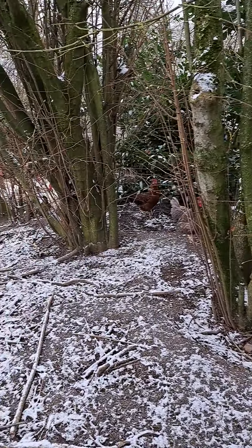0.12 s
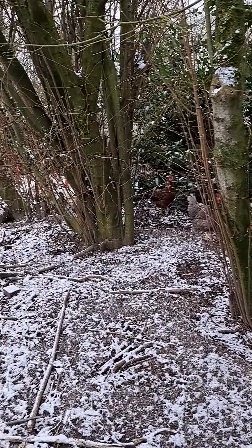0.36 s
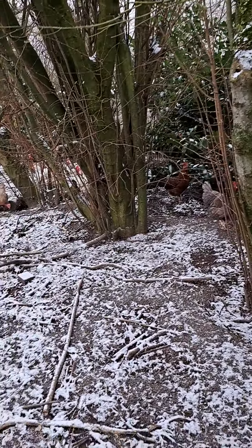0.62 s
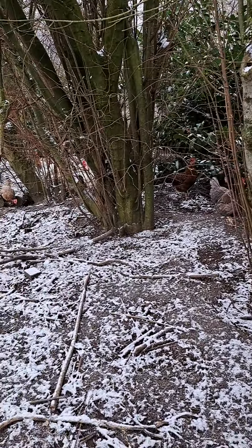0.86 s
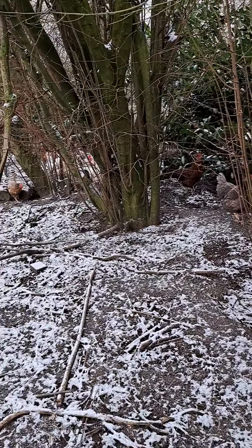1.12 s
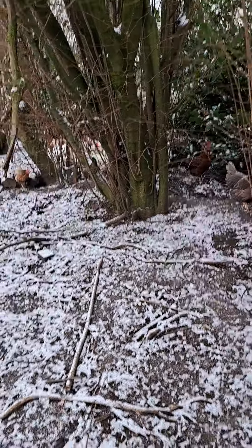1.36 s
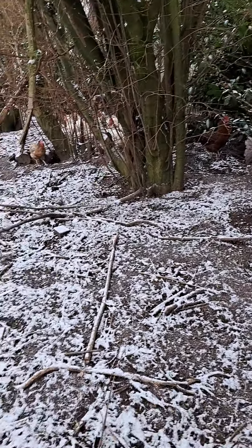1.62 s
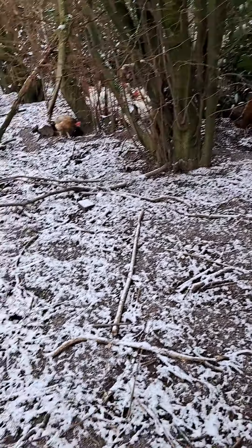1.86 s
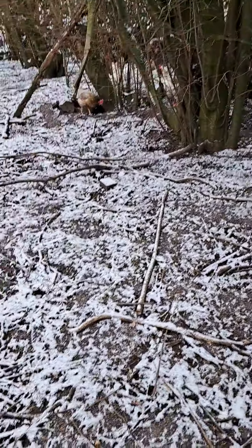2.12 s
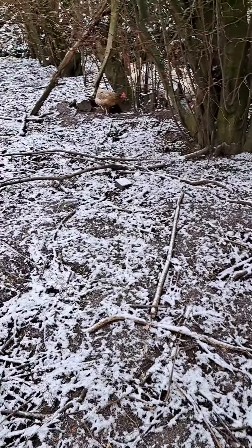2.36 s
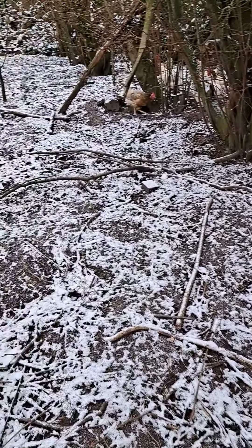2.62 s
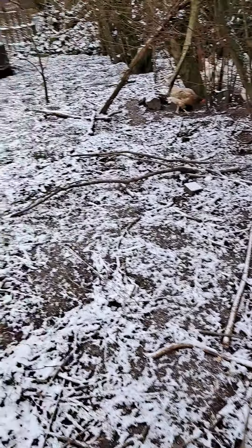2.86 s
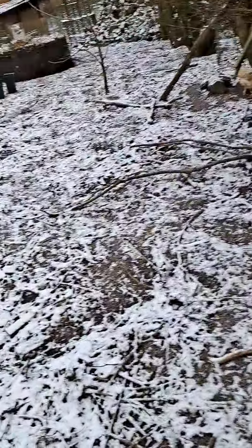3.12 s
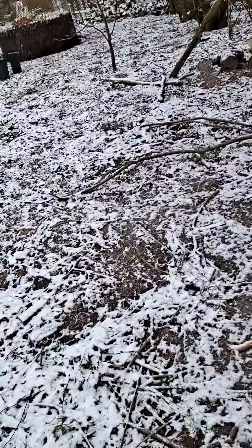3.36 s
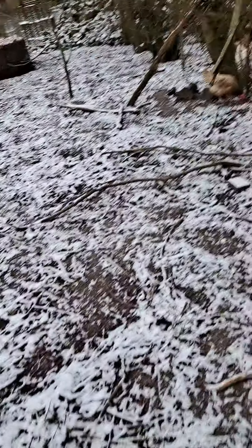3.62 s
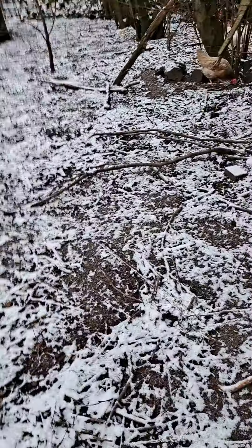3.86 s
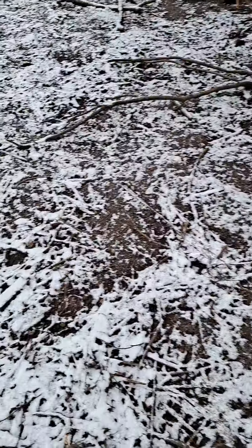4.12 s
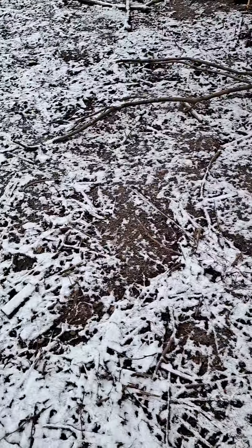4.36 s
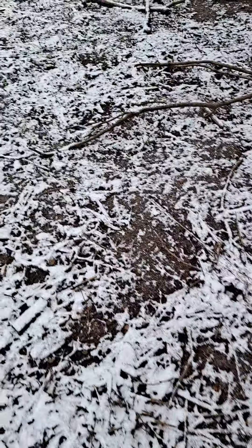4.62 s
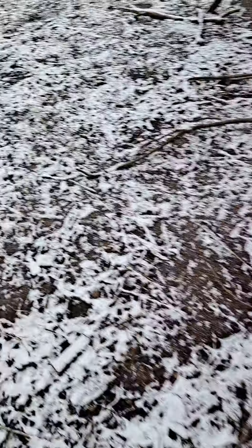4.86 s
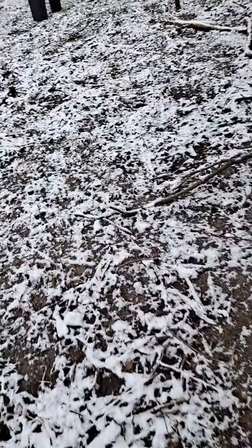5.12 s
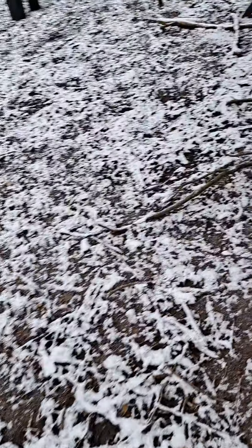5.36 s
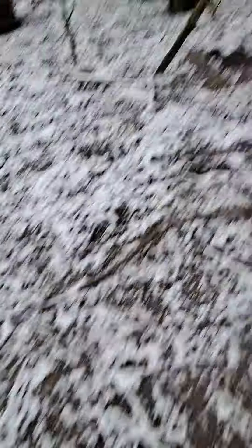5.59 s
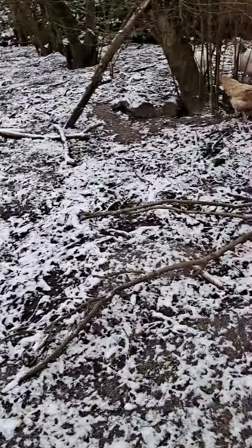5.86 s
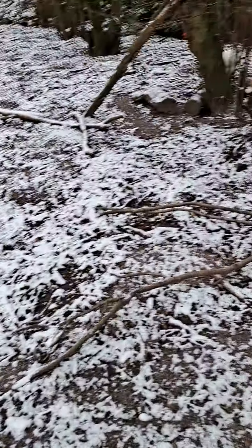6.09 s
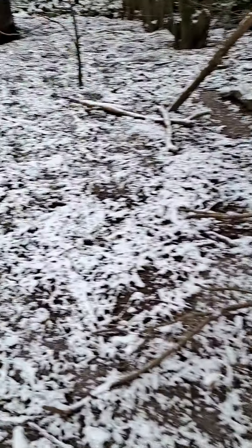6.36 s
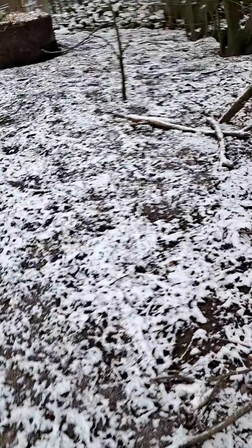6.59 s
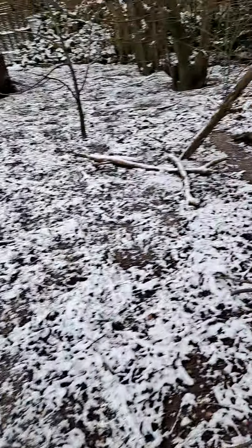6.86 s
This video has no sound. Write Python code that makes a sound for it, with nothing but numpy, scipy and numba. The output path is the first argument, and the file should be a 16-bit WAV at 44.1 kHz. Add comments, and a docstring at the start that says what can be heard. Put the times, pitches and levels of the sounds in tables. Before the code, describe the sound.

Soft gliding hen clucks open over faint outdoor air, followed by short grainy rubs of a sleeve and a small open cluck. Then uneven footsteps crush thin icy snow, dragging through frozen leaves and snapping twigs, with soft thuds beneath and airy whistles of coat fabric. A thin steady tone appears briefly late on. Near, dry stereo, with ground and hens stronger on the right and a duller, shadowed left.

```python
"""Outdoors on thin frozen snow over leaves and twigs, someone shifts and walks, phone in hand, one port to the ground.
Crust crushes in pitched grains and knocks in dull damped rings; twigs crack as noise bursts; ice crumbs tick.
Leaves rustle in clicks and hiss, soles thud in low noise, a sleeve rubs and coat fabric whistles in noise bands.
Hens cluck softly nearby in gliding tones, beside a thin, nearly steady tone, over a quiet outdoor hush."""
import sys
import numpy as np
from scipy import signal
from scipy.fft import rfft, irfft
from scipy.io import wavfile
from scipy.ndimage import uniform_filter1d
from numba import njit

SR = 44100
rng = np.random.default_rng(int(sys.argv[2]) if len(sys.argv) > 2 else 0)


def voltage_ratio(level):
    """Linear amplitude factor for a level in decibels (scalar or array-like)."""
    return 10 ** (np.asarray(level, float) / 20)


def unload_audio(sound):
    """Save the sound as a 16-bit wav file, at the path given as the first command line argument."""
    columns = np.transpose(np.atleast_2d(sound))
    # keep every value between -1 and 1, then stretch to whole-number steps
    steps = np.round(np.clip(columns, -1, 1) * 32767)
    wavfile.write(sys.argv[1], SR, steps.astype(np.int16))


N = 307675
T = np.arange(N) / SR  # seconds


def level(x, db):
    """Set the rms level in dB."""
    return x * voltage_ratio(db) / np.sqrt(np.mean(x ** 2))


def both(a_db, b_db):
    """Power sum of two levels in dB."""
    return 10 * np.log10(voltage_ratio(a_db) ** 2 + voltage_ratio(b_db) ** 2)


def colour(x, points):
    """Causal minimum-phase filter through (Hz, dB) points."""
    hz, db = np.transpose(points)
    size = 4096
    grid = np.maximum(np.arange(size // 2 + 1) * SR / size, 1)
    cepstrum = irfft(np.log(voltage_ratio(np.interp(np.log(grid), np.log(hz), db))))
    # fold the cepstrum forward in time so that the filter is causal
    cepstrum[1:size // 2] *= 2
    cepstrum[size // 2 + 1:] = 0
    impulse = irfft(np.exp(rfft(cepstrum)))
    return signal.fftconvolve(x, impulse)[:len(x)]


def no_bass(x):
    """Small pieces radiate little bass: thin the lows and lift the top."""
    return colour(x, [(40, -23.0), (220, -6.0), (400, -1.5), (17000, 13.5)])


def walk(rate):
    """Random levels held 1 / rate s and smoothed twice; spread near 1."""
    k = int(SR / rate)
    steps = np.repeat(rng.standard_normal(N // k + 1), k)
    return 1.3 * uniform_filter1d(uniform_filter1d(steps, k), k)[:N]


def strokes(s, db, swell, hold, fade):
    """Level in dB of overlapping gestures: each swells, holds and fades (slopes in dB/s)."""
    t = T[::32, None]
    each = db - swell * np.maximum(s - t, 0) - fade * np.maximum(t - s - np.abs(hold), 0)
    total = 10 * np.log10(np.sum(voltage_ratio(each) ** 2, axis=1) + 1e-12)
    return np.interp(T, t[:, 0], total)


@njit
def rings(length, start, turn, fade, size):
    """Damped sines, one for each grain, stopped once 300 times smaller."""
    out = np.zeros(length)
    for g in range(len(start)):
        z, p, i = size[g] + 0j, fade[g] * np.exp(1j * turn[g]), start[g]
        while abs(z) > size[g] / 300 and i < length:
            out[i] += z.imag
            z, i = z * p, i + 1
    return out


def ring(s, hz, cycles, size):
    """Ringing grains that lose 50 dB in about three times the given cycles."""
    start = (s * SR).astype(np.int64)
    return rings(N, start, 2 * np.pi * hz / SR, np.exp(-hz / SR * 2 / cycles), size)


def clicks(rate, spread_db):
    """Single-sample breaks at a mean rate per second, many small and a few large."""
    chance = rng.random((3, N))
    sign = np.sign(chance[1] - .5)
    return level((chance[0] < rate / SR) * sign * voltage_ratio(-spread_db * np.log(chance[2] + 1e-3)), 0)


# Hush and hiss at the lower and the upper port. Each row: frequency in Hz, relative level in dB per Hz.
LOWER_AIR = [(20, -24), (69, -14.5), (326, -2), (805, -11.5), (3590, -24.5), (7470, -1), (9360, -22),
             (13900, -1.5), (15600, -19.5), (16900, -47)]
UPPER_AIR = [(60, 2.5), (400, -2), (1500, -14.5), (4500, -36), (8000, -18.5), (16500, -18)]


def air(spectrum, db):
    """Quiet outdoor hush and microphone hiss: steady coloured noise."""
    return level(colour(rng.standard_normal(N), spectrum), db)


def tones(notes, overtones, rough_db, wobble):
    """Tones of unsteady pitch and level; the overtones die away as the effort drops."""
    out = np.zeros(N)
    for note in notes:
        s, hz, db = np.transpose(note)
        phase = 2 * np.pi * np.cumsum(np.interp(T, s, hz) * (1 + wobble * walk(140))) / SR
        effort = voltage_ratio(2 * (np.interp(T, s, db) - max(db)))
        harmonics = sum(voltage_ratio(d) * np.sin(k * phase) for k, d in overtones)
        tone = np.sin(phase) + effort * harmonics
        gate = np.clip(np.minimum(T - s[0], s[-1] - T) / 0.02, 0, 1)
        out += np.sqrt(2) * tone * gate * voltage_ratio(np.interp(T, s, db) + rough_db * walk(65))
    return out


# Soft clucks, an open-beaked cluck, a drawn-out hoarse hen note and a thin, nearly steady tone; one list per note.
# Each row: time in seconds, pitch in Hz, relative level in dB.
CLUCKS = [
    [(.02, 285, -72), (.058, 325, -57), (.1, 325, -74)],
    [(.055, 380, -72), (.08, 450, -65), (.105, 480, -76)],
    [(.185, 300, -76), (.21, 470, -68), (.3, 455, -80)],
    [(.39, 435, -73), (.55, 385, -78)],
    [(.555, 300, -74), (.585, 430, -71), (.63, 440, -79)],
]
BOK = [
    [(1.718, 350, -68), (1.742, 292, -62), (1.782, 290, -71)],
]
WHINES = [
    [(4.12, 725, -77), (4.45, 735, -76), (4.61, 700, -78)],
]
TONE = [
    [(5.15, 705, -67), (5.48, 720, -67)],
]
# Throat overtones. Each row: multiple of the pitch, level in dB against the fundamental at full effort.
CLUCK_OVERTONES = [(2, -19), (3, -19)]
BOK_OVERTONES = [(2, -9), (3, -18), (4, -1), (5, -4), (6, -6)]


def hens_and_tone(scatter):
    """Gliding hen calls and a thin, nearly steady tone, with a short smear."""
    calls = tones(CLUCKS, CLUCK_OVERTONES, 4, .055) + tones(BOK, BOK_OVERTONES, 3, .05)
    calls = calls + tones(WHINES, [], 4, .05) + tones(TONE, [], 2, .007)
    return calls + voltage_ratio(-9) * signal.fftconvolve(calls, scatter)[:N]


# Sleeve rubbing beside the lower port. Each row: peak in seconds, relative level in dB, hold in seconds,
# fade in dB/s, treble level in dB against the main hiss, centre in Hz.
RUBS = [(0.156, -77.5, 0.033, 173, 5.5, 2580), (0.668, -61, 0.027, 140, -8, 2030),
        (0.975, -58.5, 0.032, 346, 0, 2500), (1.141, -69, 0.052, 670, -9.5, 1630),
        (1.3, -58.5, 0.033, 448, -2.5, 2160)]
# Main hiss of the cloth. Each row: multiple of the centre, relative level in dB per Hz.
CLOTH = [(.3, -24), (.6, -6), (1, 5), (1.5, -4), (2.25, -27), (6, -32)]
# Treble of the cloth. Each row: frequency in Hz, relative level in dB per Hz.
CLOTH_TREBLE = [(1500, -29.5), (3500, 12.5), (6500, 4.5), (12000, -24)]


def sleeve():
    """Cloth on cloth: a grainy hiss around each rub's centre, with its own share of treble."""
    out = 0
    for s, db, hold, fade, treble_db, hz in RUBS:
        rub = rng.standard_normal(N) * voltage_ratio(1.4 * walk(190))
        body = level(colour(rub, np.multiply(CLOTH, [hz, 1])), 0)
        treble = level(colour(rub, CLOTH_TREBLE), treble_db)
        out = out + (body + treble) * voltage_ratio(strokes(s, db, 890, hold, fade))
    return out


# Coat fabric whistling in some swings. Each row: peak in seconds, relative level in dB, hold in seconds, pitch in Hz.
WHISTLES = [(2.674, -55, 0.113, 7700), (3.72, -47, 0.02, 5050), (5.074, -47.5, 0.097, 5106),
            (5.999, -52, 0.054, 4940)]


def fabric():
    """Whistling fabric: a narrow band of noise whose centre drifts."""
    s, db, hold, hz = np.transpose(WHISTLES)
    slope = 450  # dB/s, swell and fade alike
    turns = np.cumsum(np.interp(T, s, hz) * (1 + .04 * walk(16))) / SR
    low_noise = uniform_filter1d(uniform_filter1d(rng.standard_normal(N), 18), 18)
    band = low_noise * np.sin(2 * np.pi * turns)
    return level(band, 0) * voltage_ratio(strokes(s, db, slope, hold, slope) + 4.3 * walk(40))


# Soles pressing into soft soil. Each row: peak in seconds, relative level in dB, hold in seconds.
THUDS = [(2.451, -72.5, 0.52), (3.56, -63.5, 0.024), (3.658, -61, 0.026), (3.71, -55, 0.042),
         (3.913, -60.5, 0.14), (4.157, -60, 0.018), (4.39, -64.5, 0.085), (4.8, -60, 0.0108),
         (4.92, -53, 0.053), (5.114, -51, 0.0065), (5.203, -54.5, 0.0079), (5.597, -64, 0.041),
         (5.69, -49.5, 0.079), (5.886, -63.5, 0.18), (6.415, -53.5, 0.092), (6.533, -45.5, 0.018),
         (6.76, -49.5, 0.0097)]


def thud_level():
    """Level in dB of the weight on the soil, above a faint resting level."""
    s, db, hold = np.transpose(THUDS)
    swell, fade, rest_db = 254, 146, -77.5  # dB/s, dB/s, relative dB
    return both(strokes(s, db, swell, hold, fade), rest_db)


# Tone of the soft soil. Each row: frequency in Hz, relative level in dB per Hz.
RUMBLE = [(16, -32), (59, -3), (91, -6), (216, 2.5), (300, 4), (400, 0), (520, -28), (880, -120)]


def rumble(db):
    """Weight on soft soil: low noise with slow, rounded thumps in it."""
    when, tone, big = rng.random((400, 3)).T
    thumps = ring(when * N / SR, 50 * voltage_ratio(12.7 * tone), 1.55 + 0 * when, voltage_ratio(-2.5 * np.log(big + 0.0064)))
    mix = level(rng.standard_normal(N), 9.6) + level(thumps, 0)
    return level(colour(mix, RUMBLE), 0) * voltage_ratio(db)


# Leg swings and foot drags through the leaves. Each row: peak in seconds, relative level in dB, swell in dB/s,
# hold in seconds, fade in dB/s.
SWISHES = [(0.464, -72, 105, 0.12, 200), (1.696, -61.5, 23, 0.046, 77.5), (1.942, -61, 129.5, 0.23, 81),
           (2.281, -47, 2500, 0.011, 223), (2.453, -44.5, 287, 0.0083, 250), (2.537, -45, 250, 0.006, 228),
           (2.632, -48.5, 1500, 0.15, 249), (2.9, -50, 98, 0.028, 79), (3.497, -50, 44, 0.073, 200),
           (3.599, -46.5, 500, 0.093, 251.5), (3.718, -44, 170, 0.044, 500),
           (3.918, -44.5, 104, 0.021, 169.5), (4.032, -54.5, 100, 0.11, 400),
           (4.471, -55.5, 41, 0.083, 205), (4.958, -41.5, 215, 0.0203, 200), (5.091, -41.5, 61, 0.057, 260),
           (5.283, -46, 141, 0.1, 66), (5.635, -45, 131, 0.072, 326), (5.778, -43.5, 140, 0.0062, 83),
           (6.003, -47.5, 136, 0.033, 250), (6.102, -59.5, 100, 0.044, 30), (6.506, -36.5, 162, 0.018, 250),
           (6.582, -46.5, 200, 0.019, 68.5), (6.805, -47.5, 59, 0.03, 178)]


def swish_level():
    """Level in dB of the swings and drags, above clothes at rest."""
    still_db = -80.5
    return both(strokes(*np.transpose(SWISHES)), still_db)


# Tone of cloth and frozen leaves. Each row: frequency in Hz, relative level in dB per Hz.
RUSTLE = [(350, -19), (650, -3), (1700, 1), (3300, -1.5), (5000, 1), (7900, -2.5), (8700, -11.5),
          (10400, -16), (11600, -3.5), (13500, -3.5), (15700, -5), (16900, -60.5)]


def rustle(db):
    """Cloth swish and frozen leaves: dense fine clicks in a patchy hiss."""
    hiss = voltage_ratio(-1.0) * clicks(4000, spread_db=2.0) + rng.standard_normal(N)
    return level(colour(hiss * voltage_ratio(2.44 * walk(45)), RUSTLE), 0) * voltage_ratio(db)


# Ice crumbs that tick clearly. Each row: start in seconds, relative level in dB, ring in Hz.
TICKS = [(0.3353, -61, 6450), (.4116, -57, 8500), (0.8433, -55, 2340), (.9624, -53, 7200),
         (1.3817, -49, 7550), (2.0614, -48, 7280), (2.0973, -48, 2520), (2.1981, -50, 3500),
         (6.488, -28, 6500)]


def ticks(db):
    """Loose ice crumbs ring briefly: the clear ones, and a thin scatter of mixed pitch that follows the rustle."""
    when, tone, big = rng.random((1100, 3)).T
    size = voltage_ratio(np.interp(when * N / SR, T, db) + 4.5 - 4.0 * np.log(big + 0.034))
    scattered = ring(when * N / SR, 2500 * voltage_ratio(15.1 * tone), 3.7 + 0 * tone, size)
    s, clear_db, hz = np.transpose(TICKS)
    return scattered + ring(s, hz, 3.6 + 0 * s, voltage_ratio(clear_db + 5.5))


# Twigs that crack. Each row: start in seconds, relative level in dB, top-octave lift in dB.
SNAPS = [(1.953, -39, -8), (2.2753, -21, 13.5), (2.4317, -40, 20), (2.4484, -14, 7.5), (2.477, -29.5, 3),
         (2.543, -30.5, 12), (2.632, -24.5, -10), (3.1287, -26, 6), (3.5966, -19.5, -1), (3.627, -31, 10),
         (3.661, -17, -4), (3.9146, -31, 1), (3.933, -27, -6), (4.0088, -30.5, -2), (4.154, -30, -6),
         (4.922, -26.5, 6), (4.9529, -16.5, 0), (4.9962, -16, 6.5), (5.036, -24, 17.5), (5.2029, -34, 5),
         (5.439, -12, 8.5), (5.5762, -19.5, 5.5), (5.6234, -19, 0), (5.656, -17.5, 3), (5.695, -24, 0.5),
         (5.904, -38, 8), (6.477, -19.5, -9), (6.5344, -15.5, -7), (6.5396, -7.5, -10), (6.57, -27.5, 7),
         (6.674, -21.5, -18)]


def twigs():
    """Snapping twigs: each a noise burst that swells within a millisecond, then falling crumbs."""
    low, top = np.zeros((2, N))
    t = T[:SR // 12]
    shape = np.exp(-t / 0.00082) + voltage_ratio(-32.5) * np.exp(-t / 0.039)  # crack, then crumbs
    shape = shape * np.clip(t / 0.00062, 0, 1)
    for start, db, top_db in SNAPS:
        burst = shape * rng.uniform(-0.975, 1, len(t))
        # equal energy for every burst before its level
        burst = voltage_ratio(db) * burst * np.sqrt(np.sum(shape ** 2) / np.sum(burst ** 2))
        i = int(start * SR)
        low[i:i + len(t)] += burst[:N - i]
        top[i:i + len(t)] += voltage_ratio(top_db) * burst[:N - i]
    body = colour(low, [(150, -36), (400, -12.5), (1800, -4.5), (8000, 0.5), (9500, -17.5), (12000, -20.0)])
    bright = colour(top, [(8000, -19.5), (10500, -16.5), (13000, -7.0), (16500, -13.0), (17300, -88)])
    return voltage_ratio(5.5) * (body + bright)


# Dull knocks of breaking crust, and two deep thuds of the step near 5.31 and 5.71 s.
# Each row: time in seconds, shortly before the ring starts, relative level in dB, ring in Hz.
KNOCKS = [(2.0, -42, 1150), (2.272, -28, 1730), (2.446, -23.5, 862), (2.54, -33, 650), (2.63, -22.5, 940),
          (2.724, -21.5, 1330), (2.928, -32.5, 1380), (3.6, -22, 695), (3.608, -24.5, 700),
          (3.619, -30, 765), (3.625, -27, 1420), (3.634, -32, 1800), (3.659, -13.5, 1380),
          (3.676, -30, 1500), (4.152, -37, 350), (4.53, -39.5, 183), (4.918, -26, 456), (4.953, -21, 865),
          (4.993, -27, 515), (5.118, -27.5, 156), (5.2, -34, 950), (5.201, -29, 174), (5.312, -24, 61.5),
          (5.499, -39, 765), (5.708, -21, 75), (5.563, -36, 424), (5.62, -19, 527), (5.652, -25, 730),
          (5.901, -36, 1080), (5.901, -33, 188), (6.433, -34, 603), (6.466, -17, 710), (6.47, -20.5, 700),
          (6.479, -22, 1510), (6.496, -22.5, 1220), (6.508, -26, 1000), (6.522, -29, 750),
          (6.536, -25, 215), (6.564, -33, 194), (6.566, -25.5, 1110), (6.6716, -21, 3410)]


def knocks():
    """Knocks of breaking crust and two deep thuds of the step: each a damped ring."""
    s, db, hz = np.transpose(KNOCKS)
    lag_s = 0.00236
    return no_bass(ring(s + lag_s, hz, 2.43 + 0 * s, voltage_ratio(db)))


# Weight breaking through the crust. Each row: peak in seconds, relative level in dB, hold in seconds.
CRUNCHES = [(1.947, -60, 0.03), (2.375, -55.5, 0.0089), (2.467, -45.5, 0.019), (2.52, -47.5, 0.028),
            (2.705, -44.5, 0.033), (3.618, -39, 0.024), (3.66, -58, 0.017), (3.71, -54, 0.052),
            (3.965, -56, 0.11), (4.927, -42.5, 0.035), (4.993, -47, 0.065), (5.624, -45.5, 0.052),
            (6.404, -51, 0.027), (6.485, -40, 0.044), (6.631, -49, 0.057), (6.744, -53, 0.026),
            (6.97, -54, 0.02)]


def crunch_level(rustle_db):
    """Level in dB of the breaking crust, including what the drags break."""
    s, db, hold = np.transpose(CRUNCHES)
    swell, fade, drag_db = 510, 177, -11  # dB/s, dB/s, dB against the rustle of the drag
    return both(strokes(s, db, swell, hold, fade), rustle_db + drag_db)


def pressure(db):
    """0 for a light touch, 1 for full weight."""
    return np.clip((db + 73.5) / 20, 0, 1)


def scuff(db):
    """The shoe sliding on loose snow: a soft dull hiss, heard mostly while the pressure is light."""
    hiss = colour(rng.standard_normal(N), [(150, -13), (450, 1.0), (1200, -0.5), (3000, -27.5)])
    return level(hiss, 1.0) * voltage_ratio(db) * (1 - pressure(db))


def crush(db):
    """Snow crust collapsing under weight: bunches of short pitched grains, with ice crackle of mixed pitch on top."""
    when, tone, big = rng.random((3500, 3)).T
    size = voltage_ratio(-4.5 * np.log(big + 0.013) - 1.5 * tone)
    grains = ring(when * N / SR, 380 * voltage_ratio(14.54 * tone), 2.37 + 0 * tone, size)
    when, tone, big = rng.random((3000, 3)).T
    size = voltage_ratio(-4.0 * np.log(big + 0.0063) + 3.0 * tone)
    crackle = ring(when * N / SR, 1800 * voltage_ratio(14.4 * tone), 1.4 + 0 * tone, size)
    grains = level(no_bass(grains * voltage_ratio(2.57 * walk(70))), 0)
    crackle = level(crackle * voltage_ratio(6.0 * walk(90)), -6.0)
    return (grains + crackle) * voltage_ratio(db) * pressure(db)


# Shadow of hand and body over the upper port. Each row: frequency in Hz, level in dB against the lower port.
SHADOW = [(60, -17.5), (300, -12), (800, -14.5), (2400, -15.5), (4400, -25), (8100, -15), (15000, -14.5)]


def scene():
    """The lower port hears ground and clothes directly; the upper one later, shadowed and scattered by hand and body."""
    rustle_db, rumble_db = swish_level(), thud_level()
    crush_db = crunch_level(rustle_db)
    crust, soil = crush(crush_db), rumble(rumble_db)
    ground = crust + twigs() + knocks() + ticks(rustle_db)
    swish, cloth = rustle(rustle_db) + scuff(crush_db) + fabric(), sleeve()
    t = T[:SR // 40]
    scatter = level(rng.standard_normal(len(t)) * np.exp(-t / 0.012), 0) / np.sqrt(len(t))
    calls = hens_and_tone(scatter)
    # crust, knocks and freshly drawn twig bursts, smeared by a short noise tail
    scattered = voltage_ratio(-0.5) * signal.fftconvolve(crust + twigs() + knocks(), scatter)[:N]
    lag = 18  # samples
    direct = voltage_ratio(-5.0) * np.roll(ground + voltage_ratio(-9.0) * swish + voltage_ratio(1.5) * soil, lag)
    # rustle and rumble also reach the upper port as separate noise with the same gestures
    separate = voltage_ratio(-3.5) * rustle(1.66 * rustle_db + 20.0) + voltage_ratio(-4.0) * rumble(rumble_db)
    upper = colour(direct + scattered + separate, SHADOW)
    left = voltage_ratio(7.5) * upper + voltage_ratio(-6.0) * calls + air(UPPER_AIR, -76.5)
    right = voltage_ratio(4.0) * (ground + swish + soil) + voltage_ratio(8.0) * cloth + voltage_ratio(5.0) * calls + air(LOWER_AIR, -67.0)
    return np.array([left, right])


def top_cut(x):
    """Nothing passes above the cut-off."""
    return signal.sosfilt(signal.butter(12, 17080, fs=SR, output="sos"), x)


def record(dry):
    """The phone stores its upper port on the left and its lower port on the right."""
    return top_cut(dry)


dry = scene()
out = record(dry)
unload_audio(out)
```